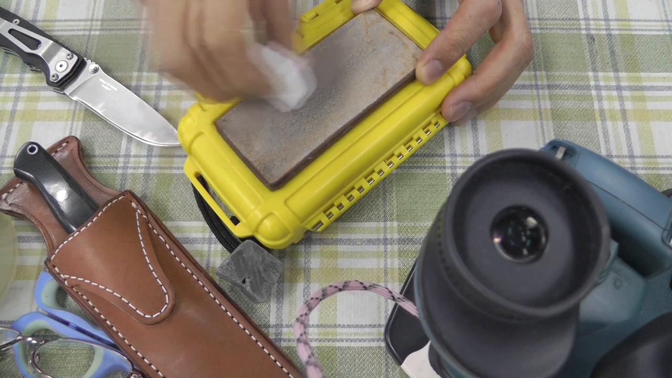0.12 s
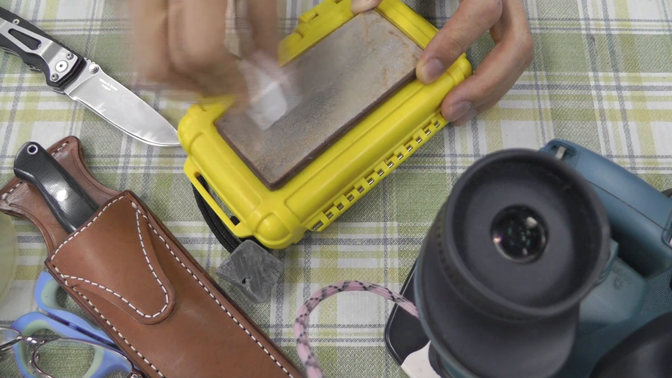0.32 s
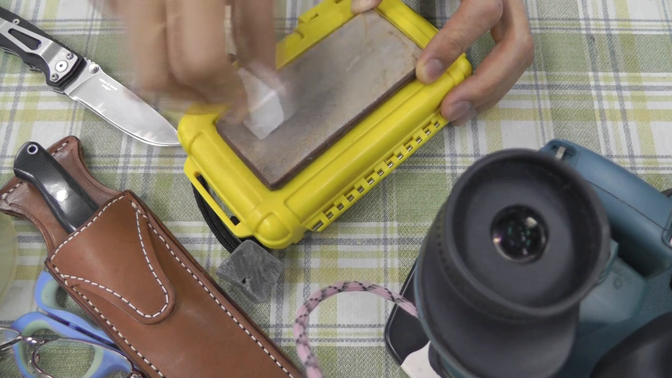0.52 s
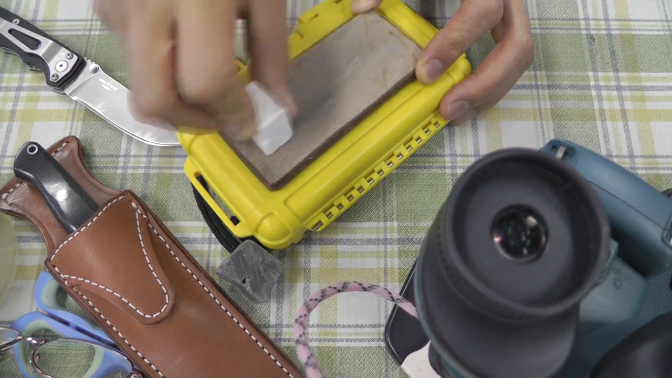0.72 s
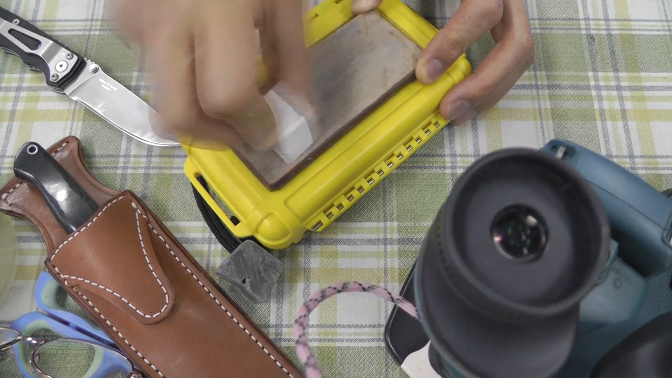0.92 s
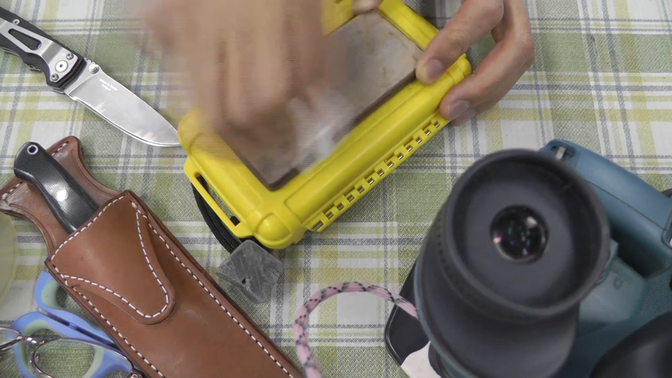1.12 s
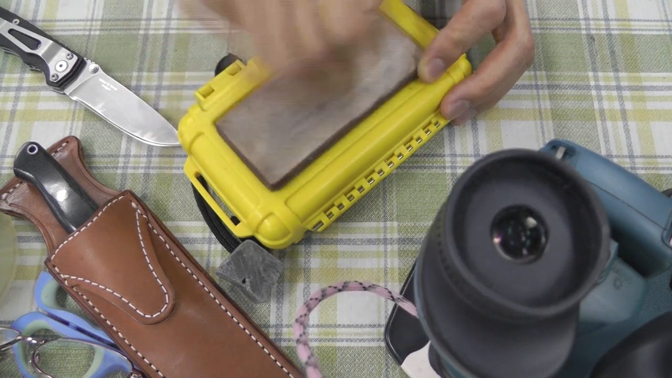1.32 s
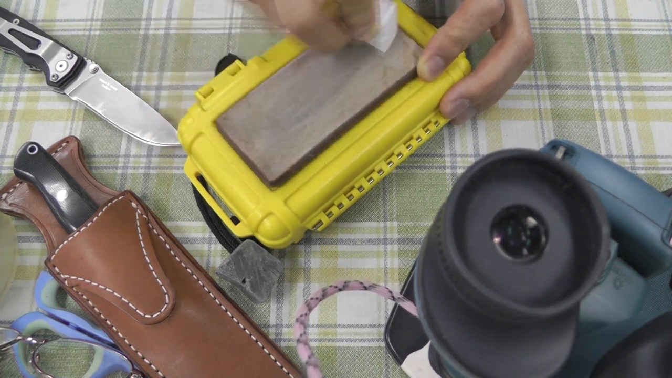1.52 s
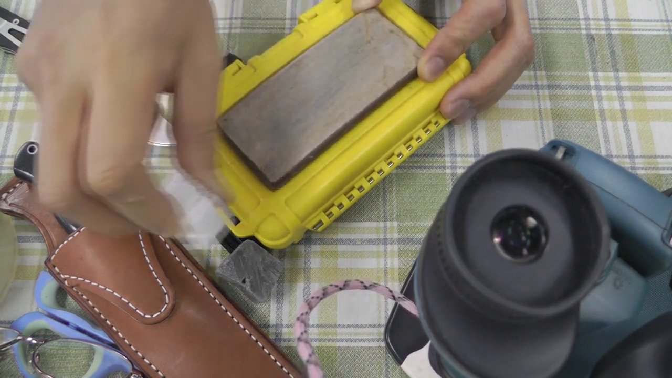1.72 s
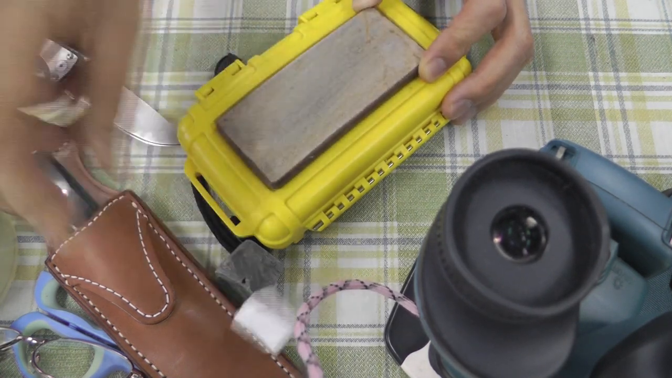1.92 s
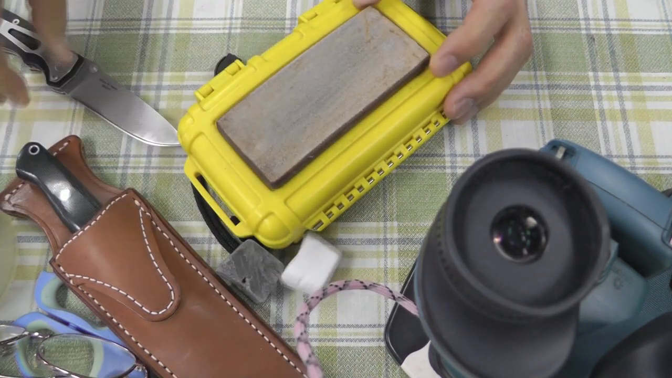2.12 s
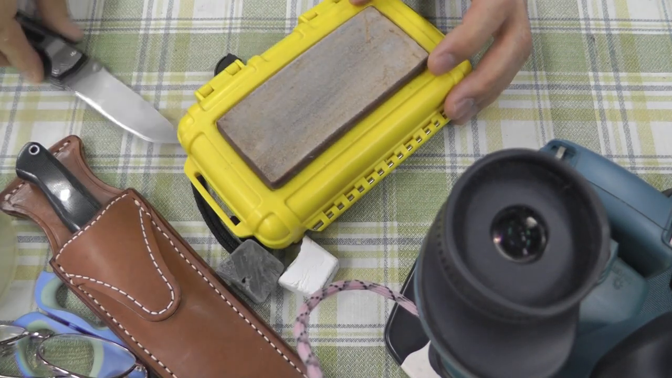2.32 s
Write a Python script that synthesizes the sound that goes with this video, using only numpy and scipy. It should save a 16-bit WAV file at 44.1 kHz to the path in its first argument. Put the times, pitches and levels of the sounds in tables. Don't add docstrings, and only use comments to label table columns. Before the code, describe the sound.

Brisk, gritty rubbing strokes on leather with hollow thumps from the plastic box beneath, ending with a clack, then a cluster of knife knocks and a soft hand brush on cloth, heard close up indoors.

```python
import sys
import numpy as np
from scipy import signal
from scipy.fft import rfft, irfft
from scipy.io import wavfile
from scipy.ndimage import uniform_filter1d

SR = 44100
rng = np.random.default_rng(int(sys.argv[2]) if len(sys.argv) > 2 else 0)


def master_out(mix):
    frames = np.transpose(np.atleast_2d(mix))
    ceiling = np.clip(frames, -1, 1)
    pcm = np.round(ceiling * 32767).astype(np.int16)
    wavfile.write(sys.argv[1], SR, pcm)


def magnitude_from_level(level_db):
    exponent = np.asarray(level_db, float) / 20
    return 10 ** exponent


N = 108045


def evened(x):
    return x / np.sqrt(np.mean(x ** 2) + 1e-20)


def read(points, hz):
    f, value = np.transpose(points)
    return np.interp(np.log(hz + 1), np.log(f + 1), value)


def add(mix, start_s, sound):
    part = mix[round(start_s * SR):][:len(sound)]
    part += sound[:len(part)]


def resonate(x, hz, width_hz):
    turn = np.exp(2j * np.pi * hz * np.arange(len(x)) / SR)
    r = np.exp(-np.pi * width_hz / SR)
    return 2 * (turn * signal.lfilter([1 - r], [1, -r], x / turn)).real


def ring(modes, rise_s, bright_db=0., shift_db=0., tune=0.99):
    t = np.arange(SR // 5) / SR
    hz, db, t60_s = np.transpose(modes)[:, :, None]
    sizes = magnitude_from_level(shift_db + db + bright_db * np.log2(hz / hz[1]) - 60 * t / t60_s)
    out = (sizes * np.sin(2 * np.pi * tune * hz * t)).sum(0)
    out = out * (1 - np.exp(-(t / rise_s) ** 2))
    return out / abs(out).max()


def shake(force, modes, tune):
    out, energy = np.zeros(N), 0
    for hz, db, t60_s in modes:
        turn = np.exp(2j * np.pi * np.cumsum(hz * tune) / SR)
        r = 10 ** (-3 / (t60_s * SR))
        out += magnitude_from_level(db) * (turn * signal.lfilter([1], [1, -r], force / turn)).imag
        energy += magnitude_from_level(2 * db) / (2 - 2 * r ** 2)
    return out / np.sqrt(energy)


def grains(per_s, spread_db):
    hit = rng.random(N) < per_s / SR
    sign, size = rng.standard_normal(N), rng.exponential(1, N)
    return hit * sign * magnitude_from_level(spread_db * np.minimum(size, 4))


# centre in Hz, width in Hz, level in dB.
COLOUR = [(2510, 590, -10), (2836, 800, -5), (3584, 280, -9), (4630, 1160, -8.5), (5570, 630, -0.5),
          (6780, 1070, -4), (8320, 1000, -5), (9570, 1580, -6.5), (13300, 2460, -16), (15000, 3700, -22)]


def grit(x, tilt_db=0., wander_db=0.):
    hop = 900
    slow = rng.standard_normal((N // hop + 2, len(COLOUR)))
    out = np.zeros(N)
    for k, (hz, width_hz, db) in enumerate(COLOUR):
        swell = np.interp(np.arange(N) / hop, np.arange(len(slow)), slow[:, k])
        gain = magnitude_from_level(db + tilt_db * np.log2(hz / 5000) + wander_db * swell)
        out += (-1) ** k * gain * resonate(resonate(x, hz, width_hz), hz, 2 * width_hz)
    return out


# frequency in Hz, level in dB per Hz.
AIR_SPECTRUM = [(18, -77), (30, -80), (75, -47), (115, 3.5), (153, -1), (394, -13.5), (554, -16.5),
                (2170, -34), (16000, -41)]
# frequency in Hz, left-right correlation from -1 to 1.
AIR_LIKENESS = [(30, 0.77), (150, 1), (16000, 0.22)]


def air():
    level_db, patch_db = -51.5, 0.88
    frames, hz = N // 256 + 5, np.fft.rfftfreq(1024, 1 / SR)
    a, b, c, d, patches = rng.standard_normal((frames, 513, 5)).T
    patches = evened(uniform_filter1d(uniform_filter1d(patches, 10, 0), 12, 1))
    same = np.clip(read(AIR_LIKENESS, hz), -1, 1)[:, None]
    left = a + 1j * b
    z = np.array([left, same * left + np.sqrt(1 - same ** 2) * (c + 1j * d)])
    z *= magnitude_from_level(read(AIR_SPECTRUM, hz)[:, None] + patch_db * patches)
    return magnitude_from_level(level_db) * evened(signal.istft(z, nperseg=1024, noverlap=768)[1][:, :N])


def room(x, t60_s, first=200):
    taps, t = np.zeros(SR // 2), np.arange(SR // 2) / SR
    at = np.arange(int(first), SR // 2 - 20, 20)
    taps[at + rng.integers(0, 20, len(at))] = rng.choice([-1., 1.], len(at))
    taps *= magnitude_from_level(-60 * t / t60_s)
    return signal.oaconvolve(x, taps / np.linalg.norm(taps))[:N]


# frequency in Hz, level in dB, t60 in seconds.
BOOM_MODES = [(190, -17, 0.32), (229.7, -6, 0.3), (277.7, 7, 0.077), (305, -15, 0.22)]
# frequency in Hz, level in dB, t60 in seconds.
DRUM_MODES = [(446, -8, 0.053), (509, 1.5, 0.05), (607.7, 0, 0.041), (679.6, -7, 0.077), (883, -6.5, 0.018),
              (986, -2.5, 0.0084), (1288, -8, 0.02), (1657, -17.5, 0.033), (1750, -44, 0.012)]
# start in seconds, length in seconds, hiss in dB, dull-to-bright mix (-14 or less all
# dull, 0 or more all bright), rumble in dB.
BRUSHES = [
    (1.7, 0.42, -63.5, -20.5, -54.5),
    (1.994, 0.27, -62, -16, -41),
    (2.213, 0.18, -71, -18, -45),
    (2.34, 0.12, -51.5, 2, -40.5),
    (2.414, 0.17, -83, 0, -43.5),
]


def cloth():
    t, out, force = np.arange(N) / SR, np.zeros(N), np.zeros(N)
    bright = evened(grit(grains(21000, 0.94), -6.5, 1.0))
    dull = evened(resonate(bright, 2700.0, 2600.0))
    for start_s, length_s, hiss_db, tilt_db, rumble_db in BRUSHES:
        arch = np.sin(np.pi * np.clip((t - start_s) / length_s, 0, 1)) ** 0.82
        dull_share = np.clip(-tilt_db / 14, 0, 1)
        out += magnitude_from_level(hiss_db) * arch * (dull_share * dull + (1 - dull_share) * bright)
        force += magnitude_from_level(rumble_db) * arch
    tap = ring(BOOM_MODES, 0.0029) + magnitude_from_level(-2.0) * ring(DRUM_MODES, 0.00041, 10.3)
    return out + signal.oaconvolve(evened(grains(700, 0.74)) * force, tap / np.linalg.norm(tap))[:N]


# frequency in Hz, level in dB, t60 in seconds.
WALL_MODES = [(521, 9.5, 0.029), (615, -47, 0.0043), (937, 0.5, 0.038), (1038, -3.5, 0.047),
              (1270, -3.5, 0.041), (1580, -12, 0.049), (2400, -26, 0.021), (2900, -18, 0.01)]
# start in seconds, drum in dB, boom in dB, tick in dB, tick in Hz.
KNOCKS = [(1.606, -23, -24, -32, 4900), (1.6285, -7, -7, -38, 2330), (2.0195, -2, 0, -25.5, 2900),
          (2.053, -13, -10.5, -43, 2800), (2.0843, -17, -13.5, -36, 6260), (2.1088, -4, -1, -31, 5000),
          (2.1418, -7, -8, -58, 5500), (2.1598, -21, -39, -41, 5200), (2.182, -26, -22, -45, 6500),
          (2.2285, -19, -38, -43.5, 3620), (2.2487, -17.5, -30, -44, 6500),
          (2.3222, -36.5, -46, -39.5, 1650), (2.073, -23, -23, -58, 5000), (2.2515, -14, -26, -48, 3020),
          (2.113, -10, -17, -39, 3000), (2.2855, -32, -49, -65, 3000), (2.3464, -44, -47, -57, 5000)]
# start in seconds, drum in dB, boom in dB, tick in dB, tick in
# Hz.
MORE_KNOCKS = [
    (0.2273, -10, -20, -46, 3080),
    (2.0169, -18.5, -42, -26.5, 2900),
    (2.0449, -15.5, -5, -40.5, 5200),
]


def knocks():
    drum_gain_db, boom_gain_db, tick_gain_db = -1, -5.5, 10.5
    click_gain_db, rattle_db, tick_ring_db, tick_tilt_db = -36, -24, 2.5, -8.5
    push_s, tick_rise_s, tick_t60_s, click_t60_s = 0.00085, 0.00057, 0.012, 0.002
    out, ticks, t = np.zeros(N), np.zeros(N), np.arange(1500) / SR
    rows = list(KNOCKS) + list(MORE_KNOCKS)
    damp = np.maximum(np.exp(-(t / 0.0071) ** 4), magnitude_from_level(-7.5))
    fade = np.hanning(2 * len(t))[len(t):]
    puffs = rng.standard_normal((len(rows), len(t)))
    for (s, drum_db, boom_db, tick_db, tick_hz), puff in zip(rows, puffs):
        wall = ring(WALL_MODES, push_s, 1.3 * (drum_db + 4.5))[:len(t)]
        add(out, s, magnitude_from_level(drum_db + drum_gain_db) * wall * damp)
        add(out, s, magnitude_from_level(boom_db + boom_gain_db) * ring(BOOM_MODES[1:3], 4.1 * push_s))
        tick = magnitude_from_level(tick_db + tick_gain_db - 60 * t / tick_t60_s) * puff * np.minimum(t / tick_rise_s, 1)
        rattle = magnitude_from_level(tick_db + tick_gain_db + rattle_db) * puff * fade
        add(ticks, s, tick + rattle)
        add(out, s, magnitude_from_level(drum_db + click_gain_db - 60 * t / click_t60_s) * puff[::-1])
        add(out, s, magnitude_from_level(tick_ring_db) * resonate(resonate(tick, tick_hz, 1200.0), tick_hz, 1700.0))
    return out + grit(ticks, tick_tilt_db)


# start in seconds, level in dB.
SWAYS = [(0.228, -45), (0.312, -48), (0.411, -41), (0.514, -44), (0.609, -40), (0.821, -48), (0.929, -37),
         (0.929, -43), (1.328, -33), (1.609, -25.5), (1.999, -55), (2.013, -34), (2.085, -34.5)]


def sways():
    out, hz = np.zeros(N), 56
    modes = [(hz, 0, 0.1), (1.4 * hz, -4, .08)]
    for (s, db), tune in zip(SWAYS, rng.uniform(0.74, 1.58, len(SWAYS))):
        add(out, s - .005, magnitude_from_level(db - 11) * ring(modes, 0.03, tune=tune))
    return out


# start in seconds, level in dB, pitch in Hz, t60 in seconds.
THUMPS = [(0.231, -16.5, 279, 0.098), (0.302, -30, 235, 0.097), (0.344, -13.5, 298, 0.068),
          (0.379, -20, 259, 0.16), (0.422, -20, 282, 0.033), (0.502, -25.5, 217, 0.1),
          (0.539, -11, 299, 0.074), (0.569, -18.5, 312, 0.12), (0.624, -17.5, 273, 0.078),
          (0.659, -35, 253, 0.044), (0.696, -14, 242, 0.075), (0.741, -6, 244.5, 0.04),
          (0.79, -22, 262.6, 0.21), (0.848, -12, 282, 0.11), (0.87, -27, 278.6, 0.12),
          (0.9, -11.5, 237, 0.098), (0.939, -18, 268, 0.11), (0.977, -9, 261.3, 0.04),
          (1.012, -16.5, 321, 0.1), (1.062, -17, 263.3, 0.064), (1.094, -17.5, 224, 0.21),
          (1.172, -11.5, 316, 0.069), (1.197, -5.5, 255.5, 0.039), (1.236, -14, 276.5, 0.086),
          (1.316, -17, 248, 0.11), (1.342, -20, 213, 0.23), (1.403, -10, 277.8, 0.17),
          (1.424, -11, 278.8, 0.13), (1.469, -22.5, 283, 0.11), (1.549, -30, 217, 0.071),
          (1.589, -24, 241, 0.084), (1.632, -15, 259, 0.13), (1.678, -11, 277.7, 0.062),
          (1.718, -13.5, 275, 0.03)]


def thumps():
    out = np.zeros(N)
    for s, db, hz, t60_s in THUMPS:
        modes = [(hz, 0, t60_s + 0.016), (1.228 * hz, -12, .06)]
        add(out, s - .003, magnitude_from_level(db + 0.5) * ring(modes, 0.0042))
    return out


# start in seconds, drum in dB, favoured spot in Hz.
CATCHES = [(0.259, -20.5, 397), (0.331, -14, 500), (0.338, -21.5, 610), (0.349, -22, 630),
           (0.427, -24, 437), (0.532, -16, 527), (0.542, -8, 555), (0.571, -27, 530), (0.642, -13, 670),
           (0.664, -17, 520), (0.695, -25, 500), (0.747, -5.5, 476), (0.756, -11.5, 603), (0.847, -22, 490),
           (0.867, -10, 420), (0.936, -23.5, 626), (0.96, -11, 654), (0.979, -24, 626), (1.069, -24, 540),
           (1.086, -16.5, 485), (1.175, -12.5, 580), (1.199, -21.5, 467), (1.239, -36, 840),
           (1.292, -21, 615), (1.332, -24, 600), (1.35, -24, 600), (1.407, -14, 384), (1.416, -11, 549),
           (1.455, -21, 538), (1.543, -24, 658), (1.553, -19.5, 530), (1.563, -17.5, 610),
           (1.643, -13.5, 610), (1.654, -12, 567), (1.667, -12.5, 540), (1.70, -34, 493),
           (1.735, -24.5, 434), (1.773, -27.5, 542), (1.803, -43, 600), (1.826, -46, 467)]


def catches():
    spot_db, spot_oct, gain_db, push_s = 11.5, 0.2, -1.5, 0.0034
    out, hz = np.zeros(N), np.transpose(DRUM_MODES)[0][:, None]
    tunes = 1 + 0.037 * rng.uniform(-1.2, 1, len(CATCHES))
    for (s, drum_db, spot_hz), tune in zip(CATCHES, tunes):
        near_db = spot_db * np.exp(-(np.log2(hz / spot_hz) / spot_oct) ** 2)
        add(out, s - .002, magnitude_from_level(drum_db + gain_db) * ring(DRUM_MODES, push_s, 0., near_db, tune))
    return out


# start in seconds, length in seconds, hiss in dB, boom in dB, drum in dB.
STROKES = [(0.224, 0.077, -43.5, -17.5, -36), (0.319, 0.075, -41, -15.5, -19),
           (0.42, 0.087, -39, -21.5, -19.5), (0.522, 0.087, -39.5, -18.5, -21.5),
           (0.625, 0.088, -37, -12.5, -13), (0.729, 0.097, -39, -15, -27.5),
           (0.835, 0.099, -39, -14, -17.5), (0.945, 0.092, -39, -14.5, -18),
           (1.055, 0.091, -37.5, -20.5, -21.5), (1.161, 0.097, -38.5, -18.5, -18.5),
           (1.271, 0.11, -38, -20, -22), (1.387, 0.12, -39.5, -26.5, -27),
           (1.511, 0.11, -39.5, -25.5, -32.5), (1.633, 0.12, -36, -15, -22)]


def strokes():
    rise, fall, skew = 0.83, 0.99, 0.95
    hiss_gain_db, boom_gain_db, drum_gain_db, rim_gain_db = 3, -5.5, -3.5, -2
    t, speed = np.arange(N) / SR, np.zeros((3, N))
    for start_s, length_s, *dbs in STROKES:
        u = np.clip((t - start_s + 0.0013) / (length_s + 0.00083), 0, 1) ** skew
        speed += magnitude_from_level(dbs)[:, None] * (2 * u) ** rise * (2 - 2 * u) ** fall
    hiss_speed, boom_speed, drum_speed = speed

    hiss = evened(grit(grains(30000, 1.5), wander_db=2.5)) * hiss_speed * magnitude_from_level(hiss_gain_db)
    hiss = hiss + magnitude_from_level(19) * hiss_speed * resonate(hiss, 5840, 1700.0)

    clumps_db = 4 * np.interp(t / 0.011, np.arange(400), rng.standard_normal(400))
    fine = evened(grains(1500, 0))
    slips = evened(fine * magnitude_from_level(clumps_db))
    lag_s, push_s = np.arange(300) / SR, 0.00069
    push = lag_s * np.exp(-4 * lag_s / push_s)
    soft = signal.oaconvolve(slips, push / push.sum())[:N]

    glides = zip((0.139, 0.139, 0.1), rng.standard_normal((3, 60)))
    boom_tune, drum_tune, rim_tune = (1 + g * np.interp(t / 0.076, np.arange(60), bend) for g, bend in glides)
    rims = [(hz, db + 2.2 * np.log2(hz / 1000), t60_s) for hz, db, t60_s in DRUM_MODES[4:]]
    rub = uniform_filter1d(fine + slips, size=12) / 2
    rub = rub * np.sqrt(hiss_speed * drum_speed) * magnitude_from_level(rim_gain_db)
    rim = shake(rub, rims, rim_tune)
    boom = shake(soft * boom_speed * magnitude_from_level(boom_gain_db), BOOM_MODES, boom_tune)
    drum = shake(soft * drum_speed * magnitude_from_level(drum_gain_db), DRUM_MODES[:4], drum_tune)
    return hiss + rim + boom + drum


# frequency in Hz, level in dB.
WIDE_ECHO = [(60, -16), (250, -22), (700, -25), (1290, -15.5), (2400, -24.5), (4400, -34), (8100, -20),
             (15000, -12)]
# frequency in Hz, left minus right in dB.
LEAN = [(60, -0.5), (180, 0), (550, 0.0), (1200, .8), (4400, 0), (8500, 2.2), (12500, .3)]


def scene():
    near = strokes() + catches() + knocks() + cloth() + thumps()
    near = near + magnitude_from_level(-14.5) * uniform_filter1d(room(near, 0.38), size=3)
    hz = np.fft.rfftfreq(N, 1 / SR)
    ratio = 1j * hz / 150
    cut = (ratio / (1 + ratio)) ** 3
    mid = rfft(near) * cut
    side = rfft(room(near, 0.01, 5.1)) * cut * magnitude_from_level(read(WIDE_ECHO, hz))
    port = magnitude_from_level(read(LEAN, hz) / 2)
    ports = irfft(np.array([mid * port + side, mid / port - side]), N)
    return ports + air() + sways() * magnitude_from_level([[-1.5], [1.5]])


def roll_off(x):
    return signal.sosfilt(signal.butter(12, 16470, fs=SR, output="sos"), x)


def record(dry):
    low_pass = signal.firwin(511, 15780, window=("kaiser", 9), fs=SR)
    mix = signal.oaconvolve(dry, low_pass[None], "same")
    return roll_off(mix)


dry = scene()
out = record(dry)
master_out(out)
```